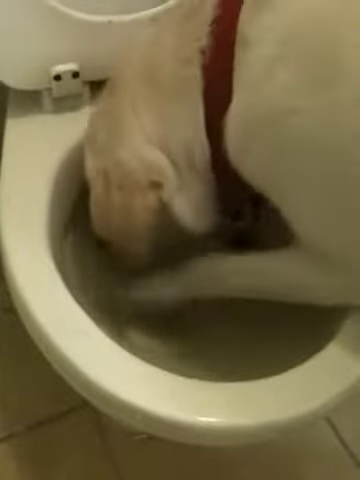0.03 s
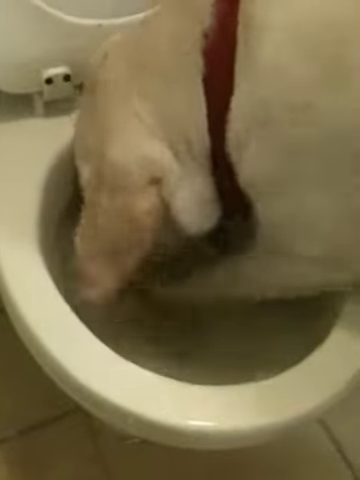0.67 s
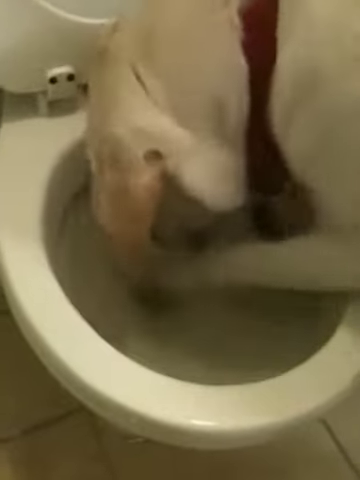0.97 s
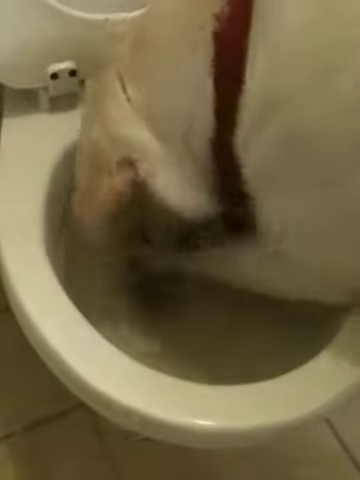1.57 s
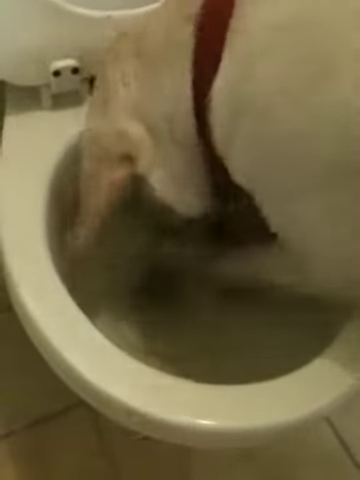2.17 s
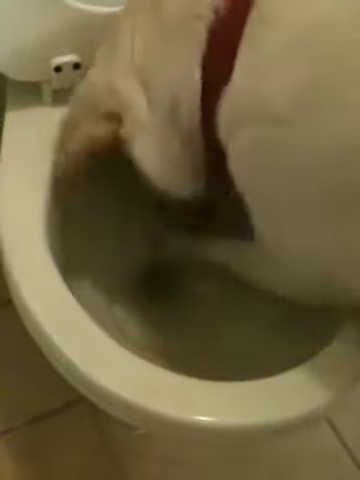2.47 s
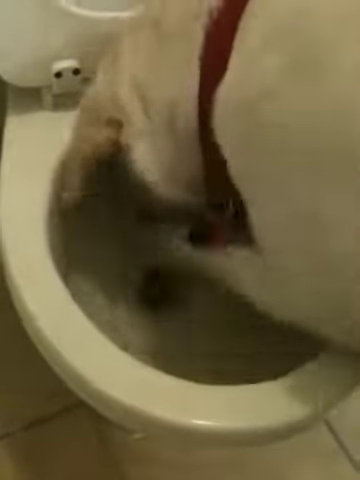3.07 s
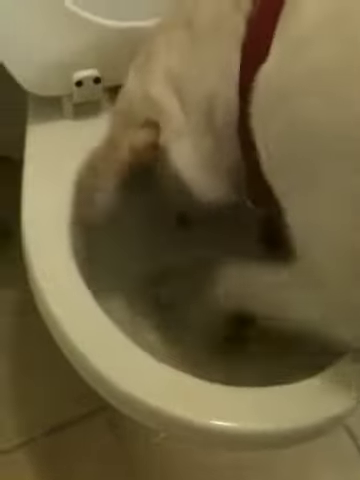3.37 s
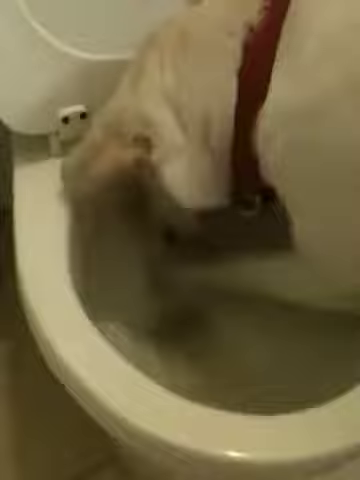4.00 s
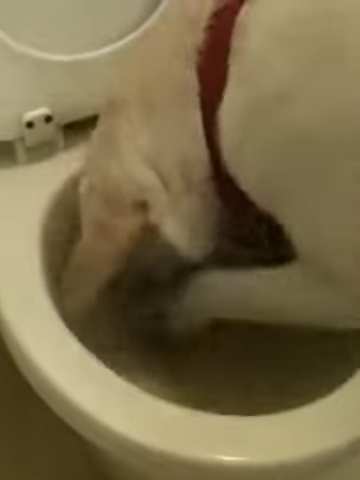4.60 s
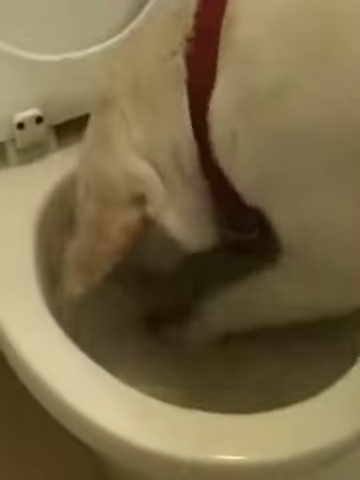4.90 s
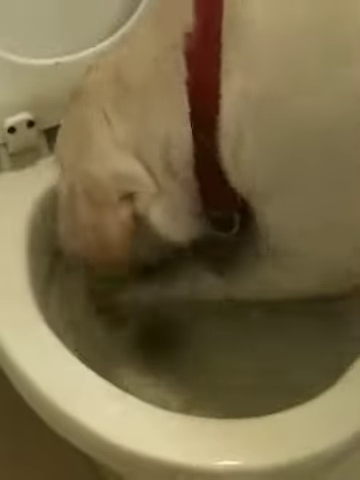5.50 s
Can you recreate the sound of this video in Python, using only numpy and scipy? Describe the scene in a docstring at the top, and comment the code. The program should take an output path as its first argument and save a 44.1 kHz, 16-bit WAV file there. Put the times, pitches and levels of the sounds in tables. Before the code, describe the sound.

A dog digs in toilet water with a front paw, heard from just above the bowl. Splashing starts at once and continues for nearly six seconds in uneven strokes, about three a second. Each stroke slaps the water, throws hissing spray and stirs up bubbles and rising plips. Deeper gulps stand out at about 0.9, 1.3 and 1.9 seconds. Claws and drops tick sharply on the porcelain, most clearly around 1.8, 2.5, 2.9, 4.5 and 5.2 seconds. The leg judders along the bowl with short runs of low, dull thuds near 2.5 and 4 seconds, then bumps it at 4.5 and faintly at 5.6. The slaps get slightly stronger from about 4.5 seconds onward. The bowl adds a hollow ring, and the small tiled bathroom gives a short echo over a faint steady hush.

```python
"""In a small tiled bathroom, heard from just above the toilet, a dog digs in the water with a front paw.
Each stroke slaps the water, throws spray on the porcelain and drags air under, which rises as gulps
and plips. Claws and drops tick on the porcelain, and the leg judders along the bowl with low thuds.
The room echoes and the hollow of the bowl colours it all, over a faint steady hush."""
import sys
import numpy as np
from scipy import signal
from scipy.fft import rfft, irfft, next_fast_len
from scipy.io import wavfile
from scipy.ndimage import uniform_filter1d, map_coordinates

SR = 44100
rng = np.random.default_rng(int(sys.argv[2]) if len(sys.argv) > 2 else 0)


def store_wav(level_fs):
    """Save 16-bit WAV to argv[1]."""
    pcm = np.round(np.clip(np.atleast_2d(level_fs), -1, 1) * 32767)
    wavfile.write(sys.argv[1], SR, pcm.T.astype(np.int16))


N = 249165

# The tone of moving water: low gurgle, middle splash and high spray. Columns: pitch_hz, level_db
GURGLE_TONE = [(25, -54), (100, -37), (180, -4.5), (300, 2), (500, -5), (800, -1), (1100, -0.5),
               (2500, -45)]
SPLASH_TONE = [(500, -12), (900, -3), (1500, 4), (2500, 3.5), (4200, 2.5), (5500, -4), (9000, -32)]
SPRAY_TONE = [(2350, -53), (4000, -11), (4820, -4.5), (6330, 1), (6900, -1.5), (9550, -4), (13000, -13.5),
              (15100, -14), (16000, -28)]
# How long the tiled room echoes. Columns: pitch_hz, fade_s (the time to fall by 60 dB)
ROOM_ECHO = [(150, 0.11), (600, 0.2), (2000, 0.22), (6000, 0.076), (15000, 0.081)]


def amp(db):
    """Turn decibels into a number to multiply by."""
    return 10 ** (np.asarray(db) / 20)


def unit(x):
    """Scale x to an average power of 1."""
    return x / np.sqrt(np.mean(x ** 2) + 1e-20)


def fade(t, fade_s):
    """A curve that falls by 60 dB in fade_s."""
    return np.exp(-np.log(1000) * t / np.maximum(fade_s, 1e-4))


def look_up(table, hz):
    """Read between the rows of a (pitch_hz, value) table, with octaves evenly spaced."""
    pitches, values = np.transpose(table)
    return np.interp(np.log(hz + 1), np.log(pitches + 1), values)


def filtered(x, response):
    """Multiply each frequency in x by response(hz)."""
    size = next_fast_len(N + SR // 2)
    return irfft(rfft(x, size) * response(np.fft.rfftfreq(size, 1 / SR)), size)[:N]


def coloured(x, tone):
    """Shape x with a (pitch_hz, level_db) table, then scale it to a power of 1."""
    return unit(filtered(x, lambda hz: amp(look_up(tone, hz))))


def keep_side(x, side, hz, order):
    """Keep the "low" or "high" side of hz; a higher order cuts more sharply."""
    return signal.sosfilt(signal.butter(order, hz, side, fs=SR, output="sos"), x)


def wobble(per_s):
    """A smooth curve through per_s random points a second."""
    return map_coordinates(rng.standard_normal(int(N * per_s / SR) + 4), [np.arange(N) * per_s / SR])


def add(track, start_s, sound):
    """Mix a sound into a track at start_s."""
    start = max(round(start_s * SR), 0)
    part = sound[:max(N - start, 0)]
    track[start:start + len(part)] += part


def patchy_noise(patchy_db, size=256):
    """Noise in short louder and softer patches, so its tone keeps changing."""
    bands = signal.stft(rng.standard_normal(N), nperseg=size)[2]
    patches = uniform_filter1d(rng.standard_normal(bands.shape), 5, axis=0)
    patches = unit(uniform_filter1d(patches, 3, axis=1))
    return unit(signal.istft(bands * amp(patchy_db * patches), nperseg=size)[1][:N])


def bubbles(low_hz, high_hz, cycles, rise, scatter_db, count, size):
    """A cloud of bubbles: each rings for some cycles and rises in pitch."""
    when, pitch, weight, life = rng.random((count, 4)).T[:, :, None]
    hz = low_hz + (high_hz - low_hz) * pitch
    fade_s = cycles * (.5 + life) / hz
    t = np.arange(size) / SR
    glide = 1 + rise * np.minimum(t / fade_s, 1) / 2
    ring = np.sin(2 * np.pi * hz * t * glide) * fade(t, fade_s)
    strength = amp(scatter_db * weight ** 2) / np.sqrt(fade_s)
    where = (when * N).astype(int) + np.arange(size)
    return unit(np.bincount(where.ravel(), (strength * ring).ravel(), N)[:N])


def paw_strokes(rise_s=0.015, settle_s=0.26, surge_db=2.5):
    """How strong gurgle, splash and spray are as each stroke builds up, holds and settles."""
    # The paw drags through the pool. Columns: start_s, length_s, splash_db, gurgle_db, spray_db
    # (the last two are counted from splash_db)
    strokes = [(0.0, 0.007, -44.5, -7.5, 1), (0.162, .3, -51, -13, 2), (0.467, 0.13, -48.5, -12.5, -2),
               (0.682, 0.3, -48.5, -7, 3), (1.104, 0.25, -50.5, -6.5, 0), (1.567, 0.072, -50.5, -9.5, 3),
               (1.765, 0.553, -52, -9.5, 6), (2.464, 0.24, -55.5, -4.5, 4.5), (2.936, 0.37, -52, -13, 3),
               (3.282, 0.12, -44.5, -10.5, -0.5), (3.412, 0.49, -52.5, -28, 3),
               (3.64, 0.22, -46.5, -9, 1.5), (4.026, .22, -53.5, -13, 6), (4.472, 0.31, -50, -8.5, 3),
               (4.83, 0.32, -50.5, -7.5, 4.5), (5.21, .22, -50, -15, 5), (5.51, 0.19, -57, -8, 1.5)]
    # The pool sloshing between strokes. Columns: gurgle_db, splash_db, spray_db
    slosh_db = [-74.5, -65.5, -60]
    t = np.arange(N) / SR
    power = np.outer(amp(slosh_db) ** 2, np.ones(N))
    for start_s, length_s, splash_db, gurgle_db, spray_db in strokes:
        build = np.clip((t - start_s) / rise_s, 0, 1)
        settle = fade(np.maximum(t - start_s - length_s, 0), settle_s)
        power += np.outer(amp(splash_db) * amp([gurgle_db, 0, spray_db]), build * settle) ** 2
    return np.sqrt(power) * amp(surge_db * wobble(per_s=40))


def churning_water(foam_db=(-7, -7, -3), drops_db=-9):
    """The paw stirs up foam and three sizes of bubble; stray drops fall back."""
    clouds = [bubbles(198.4, 933, cycles=46, rise=0.488, scatter_db=8, count=700, size=4000),
              bubbles(866, 4836, cycles=46, rise=0.17, scatter_db=7.5, count=5000, size=1200),
              bubbles(4280, 17100, cycles=67, rise=0.18, scatter_db=8.5, count=14000, size=240)]
    stir = paw_strokes()
    out = np.zeros(N)
    for strength, cloud, db, tone in zip(stir, clouds, foam_db, (GURGLE_TONE, SPLASH_TONE, SPRAY_TONE)):
        foam = patchy_noise(patchy_db=4.5)  # bubbles too many to tell apart
        out += strength * coloured(cloud + amp(db) * foam, tone)
    drops = bubbles(3550, 9430, cycles=71, rise=0.063, scatter_db=23, count=260, size=600)
    return out + amp(drops_db) * stir[-1] * drops  # more spray in the air makes louder drops


def slaps(cavity_db=8, width_octaves=0.78, air_db=-13, spray_db_per_octave=7, even_hz=2304, size=8192):
    """Each slap tears the water into a quick spatter, coloured by the hole (cavity) that it opens."""
    # The paw or thrown water hits the pool. Columns: start_s, level_db, trapped_air_db, cavity_hz, fade_s
    hits = [(0.016, -37.5, -6, 3200, 0.054), (0.1121, -44, 4, 3930, 0.047), (0.1423, -35.5, 4, 1800, 0.038),
            (0.213, -39, -10, 4400, 0.063), (0.267, -34, -1, 2420, 0.031), (0.3318, -33.5, -9, 2300, 0.14),
            (0.4632, -34, -6, 1130, 0.061), (0.518, -32.5, 0, 2000, 0.083), (0.5435, -38, 6, 2220, .09),
            (0.56, -38.5, 3, 2300, .06), (0.664, -38, -8, 2580, 0.037), (0.6765, -32, 6, 1980, 0.062),
            (0.7124, -32.5, -9, 2730, 0.13), (0.7313, -33.5, 0, 1880, 0.13), (0.75, -33, 4, 2100, 0.09),
            (0.8846, -35, 2, 1780, 0.16), (0.9095, -29, 14, 2200, 0.096), (0.9797, -36, -4, 4660, 0.021),
            (1.0685, -41, 3.5, 4100, 0.16), (1.092, -39, -12, 3370, 0.049), (1.145, -39, -13, 2180, 0.19),
            (1.178, -35.5, -4, 2960, 0.093), (1.2615, -41, 0, 1700, .05), (1.281, -34, 3.5, 1350, .1),
            (1.298, -38.5, 14, 1670, 0.11), (1.582, -38.5, -19, 4300, .044), (1.593, -31, -16, 1940, 0.05),
            (1.7575, -32, 1.5, 3360, 0.08), (1.788, -45, 23.5, 2590, .07), (1.958, -42.5, -6, 4400, 0.043),
            (2.0042, -37, 0.5, 3120, 0.045), (2.02, -36, -13, 4500, 0.046), (2.094, -36, -28, 3900, 0.034),
            (2.225, -41.5, 5, 2130, 0.13), (2.3426, -42, -8, 4330, 0.04), (2.393, -38, 0.5, 3370, 0.081),
            (2.5125, -37, -18, 3320, 0.044), (2.5373, -31.5, -2, 2400, 0.044),
            (2.6182, -36, -4, 4400, .055), (2.808, -41, 9, 4230, 0.056), (2.9248, -34, -28, 3400, .07),
            (3.064, -36.5, -2, 5600, 0.043), (3.1581, -37, 1, 1900, 0.082),
            (3.3002, -30.5, -4.5, 2600, 0.095), (3.3224, -31.5, -22, 2200, .06),
            (3.498, -35, -19, 3740, 0.019), (3.54, -33.5, -4, 2980, 0.1), (3.607, -35.5, -16, 3260, 0.034),
            (3.707, -37.5, 9, 3260, 0.13), (3.8184, -42.5, -10, 3600, .16),
            (3.959, -36.5, 4.5, 3860, 0.083), (4.097, -30, -2, 2860, 0.04),
            (4.1202, -36.5, 14.5, 1400, 0.05), (4.19, -38, 0, 2360, 0.098), (4.344, -35, 0, 2740, 0.09),
            (4.4598, -39, -8, 4900, 0.076), (4.48, -33, -8, 2100, .06), (4.506, -34, 0, 3500, 0.054),
            (4.5193, -27.5, -6, 2000, 0.045), (4.6683, -35.5, 7.5, 3200, 0.14),
            (4.69, -31.5, 1, 3200, 0.05), (4.8522, -29.5, 0.5, 3460, 0.068),
            (4.8935, -30.5, -6, 1900, 0.031), (4.906, -29, 4.5, 2600, 0.11), (5.071, -33.5, 4.5, 2400, .19),
            (5.205, -33, 0, 3870, 0.051), (5.2214, -29.5, -4.5, 2860, 0.069),
            (5.243, -41, 11.5, 1840, 0.27), (5.3107, -30, -5, 1590, 0.054),
            (5.318, -24.5, -14, 3060, 0.035), (5.4154, -35.5, -11, 4120, 0.065),
            (5.5022, -35, -7, 2940, 0.12), (5.578, -34, -5, 1840, .036), (5.6297, -31, -18, 2420, 0.027)]
    out, t, hz = np.zeros(N), np.arange(size) / SR, np.fft.rfftfreq(size, 1 / SR)
    spatter = patchy_noise(patchy_db=4) * amp(0.5 * wobble(per_s=450))
    spatter = np.pad(spatter, (0, size), "reflect")
    gurgle, splash, spray = (unit(amp(look_up(tone, hz)))
                             for tone in (GURGLE_TONE, SPLASH_TONE, SPRAY_TONE))
    for start_s, level_db, trapped_air_db, cavity_hz, fade_s in hits:
        cavity = amp(cavity_db * np.exp(-(np.log2((hz + 1) / cavity_hz) / width_octaves) ** 2))
        # A smaller, higher hole throws more spray; at even_hz, spray and splash are equal.
        spray_db = spray_db_per_octave * np.log2(cavity_hz / even_hz)
        colour = amp(air_db + trapped_air_db) * gurgle + unit(splash * cavity) + amp(spray_db) * spray
        burst = irfft(rfft(spatter[round(start_s * SR):][:size]) * colour)
        swell = 1 - np.exp(-t / (0.023 * fade_s))  # broad splashes swell, small ones snap
        add(out, start_s, amp(level_db) * burst * fade(t, fade_s) * swell)
    return keep_side(out, "high", hz=120, order=1)  # the slaps carry little deep bass


def gulps(waver=0.061):
    """Trapped air rings and climbs unsteadily in pitch as it nears the surface."""
    # Single air pockets and big bubbles. Columns: start_s, level_db, pitch_hz, fade_s, climb_octaves
    pockets = [(0.144, -36.5, 1790, 0.078, 0), (0.233, -39, 1395, 0.11, 1.3), (0.245, -45, 530, 0.2, .6),
               (0.475, -31.5, 740, 0.034, 0.73), (0.486, -34.5, 1000, 0.17, 1.7),
               (0.52, -34.5, 367, 0.15, 0.052), (0.544, -37, 672, .09, 0.11), (0.75, -38, 683, 0.086, 0.96),
               (0.803, -39, 536, 0.14, 0), (0.913, -19, 504, 0.02, 0), (0.924, -26, 274.5, 0.081, 1.3),
               (1.182, -24.5, 607, 0.015, .1), (1.2908, -2, 467, 0.0091, 0),
               (1.296, -30.5, 394, 0.077, 1.14), (1.86, -14, 263, 0.034, 1),
               (1.877, -4.5, 314, 0.021, 0.24), (1.883, -20.5, 514, 0.037, 1.07),
               (1.905, -36.5, 847, 0.082, 2.1), (2.033, -30.5, 1100, 0.022, 0.19),
               (2.226, -29.5, 2350, 0.053, 0.67), (2.312, -33, 3320, 0.053, 1.4),
               (2.552, -36.5, 384, 0.11, 0), (2.632, -36.5, 367, 0.11, .2), (3.208, -37, 895, 0.12, 2.2),
               (3.371, -32, 890, 0.068, 1.1), (3.39, -31, 1300, 0.044, 0.43),
               (3.787, -39.5, 1083, .18, 0.66), (3.862, -31.5, 2005, 0.028, 0.4),
               (4.045, -26, 212, .055, 0), (4.124, -29.5, 544, 0.02, 0.51),
               (4.199, -31.5, 930, 0.036, 0.26), (4.483, -17.5, 2540, 0.013, 0.33),
               (4.521, -21, 2030, 0.021, 0.65), (4.59, -41.5, 686, 0.16, 2.9),
               (4.895, -32, 695, 0.071, 0.11), (5.008, -33, 2630, .025, 0.22), (5.075, -37, 704, 0.05, 0),
               (5.245, -23, 2230, 0.021, 0.094), (5.272, -33.5, 638, 0.032, 0.05),
               (5.317, -29.5, 1315, 0.047, 0.11)]
    out, t = np.zeros(N), np.arange(SR // 5) / SR
    drift = np.pad(wobble(per_s=260), (0, len(t)))
    for start_s, level_db, pitch_hz, fade_s, climb_octaves in pockets:
        climb = 2 ** (climb_octaves * np.minimum(t / fade_s, 1))
        unsteady = 1 + waver * drift[round(start_s * SR):][:len(t)]
        ring = np.sin(2 * np.pi * np.cumsum(pitch_hz * climb * unsteady) / SR)
        swell = 1 - np.exp(-t * pitch_hz / 1.36)
        add(out, start_s, amp(level_db) * swell * fade(t, fade_s) * ring)
    return keep_side(out, "high", hz=215, order=3)


def porcelain_ticks(ring_cycles=15.4, boost_db=3):
    """Claws and drops strike the hard porcelain: a brief ring with a crack of noise."""
    # Each sharp little contact. Columns: start_s, level_db, pitch_hz
    contacts = [(0.34, -31, 4450), (0.9205, -15, 6700), (1.762, -7.5, 8040), (1.7846, -14.5, 9150),
                (2.053, -25, 4250), (2.098, -12, 5570), (2.436, -22, 7800), (2.522, -12, 5840),
                (2.524, -9.5, 6100), (2.621, -17, 4130), (2.9229, -5.5, 8940), (3.563, -18, 5800),
                (3.6017, -19, 5370), (4.1014, -21, 2450), (4.524, -12.5, 3560), (4.908, -13.5, 3230),
                (5.2019, -11.5, 7000), (5.504, -17, 5430)]
    out, t = np.zeros(N), np.arange(SR // 50) / SR
    for start_s, level_db, pitch_hz in contacts:
        snap = np.sin(2 * np.pi * pitch_hz * t) + 0.037 * rng.standard_normal(len(t))
        shape = fade(t, ring_cycles / pitch_hz) * (1 - np.exp(-t * pitch_hz))
        add(out, start_s, amp(level_db + boost_db) * snap * shape)
    return keep_side(out, "high", hz=1800, order=2)


def leg_knocks(average_gap_s=0.034, weaken_db_per_s=40, scatter_db=2):
    """A padded leg gives the heavy bowl only low, short thuds, in uneven runs that weaken."""
    # The leg judders along the bowl. Columns: start_s, length_s, level_db
    rubs = [(2.476, .29, -29), (4.044, .26, -28), (4.517, .02, -24.5), (5.581, .04, -34)]
    # The dull tone of a thud. Columns: pitch_hz, level_db
    thud_tone = [(30, -23), (90, -35), (160, -2), (300, -3.5), (450, -13), (900, -24), (3000, -63)]
    push, t = np.zeros(N), np.arange(SR // 5) / SR
    thud = fade(t, fade_s=0.05) * (1 - np.exp(-t / 0.016))
    for start_s, length_s, level_db in rubs:
        gap, strength = rng.random((12, 2)).T
        delays = average_gap_s * np.append(0, np.cumsum(.5 + gap[1:]))
        for delay, chance in zip(delays[delays < length_s], 2 * strength - 1):
            knock_db = level_db - weaken_db_per_s * delay + scatter_db * chance
            add(push, start_s + delay, amp(knock_db) * thud)
    return push * coloured(rng.standard_normal(N), thud_tone)


def ringing_echo(x):
    """An echo that keeps the pitch of the sound that starts it."""
    hz, t, bands = signal.stft(rng.standard_normal(SR // 2), SR, nperseg=256)
    tail = signal.istft(bands * fade(t, look_up(ROOM_ECHO, hz)[:, None]), SR, nperseg=256)[1]
    late_tail = np.pad(tail / np.linalg.norm(tail), (SR // 200, 0))
    return signal.fftconvolve(x, late_tail)[:N]


def scattered_echo(x, size=256):
    """The energy at each pitch comes back a moment later as noise and dies away."""
    hz, t, bands = signal.stft(x, SR, nperseg=size)
    kept_per_step = fade(t[1], look_up(ROOM_ECHO, hz)) ** 2
    energy = np.array([signal.lfilter([0, 1 - kept], [1, -kept], np.abs(band) ** 2)
                       for kept, band in zip(kept_per_step, bands)])
    noise = signal.stft(rng.standard_normal(N), nperseg=size)[2]
    return signal.istft(noise / np.std(noise) * np.sqrt(np.abs(energy)), nperseg=size)[1][:N]


def bathroom(x, ring_db=-9, scatter_db=-6.5, split_hz=1700):
    """Between the tiled walls low sounds ring on, while high sounds scatter."""
    low, high = (keep_side(x, side, split_hz, order=4) for side in ("low", "high"))
    return x + amp(ring_db) * ringing_echo(low) + amp(scatter_db) * scattered_echo(high)


def bowl(x):
    """The air in the hollow of the bowl rings along with the direct sound."""
    # The notes of the hollow. Columns: pitch_hz, width_hz, level_db (counted from the direct sound)
    notes = [(240, 6, -9), (294.4, 13, 4), (376.4, 6, 1), (576, 28, 1), (634.5, 52, 2), (680, 15.6, 7),
             (1980, 200, -9), (3400, 194, -4)]
    return filtered(x, lambda hz: 1 + sum(
        amp(level_db) * 1j * hz * width_hz / (pitch_hz ** 2 - hz ** 2 + 1j * hz * width_hz)
        for pitch_hz, width_hz, level_db in notes))


def room_hush(level_db=-64):
    """The faint, steady background noise of the room."""
    # The tone of the quiet room. Columns: pitch_hz, level_db
    hush_tone = [(25, -1.5), (120, 3), (280, 17.5), (600, -15), (2000, -17), (8000, -9), (16000, -6.5)]
    return amp(level_db) * coloured(rng.standard_normal(N), hush_tone)


def scene():
    """All the digging echoes in the room and sounds through the hollow of the bowl."""
    hush = room_hush()
    digging = churning_water() + slaps() + gulps() + porcelain_ticks() + leg_knocks()
    return (bowl(bathroom(digging)) + hush)[None]


def record(dry, top_hz=16000):
    """Cut away the very highest treble, above top_hz."""
    return filtered(dry[0], lambda hz: 1 / np.sqrt(1 + (hz / top_hz) ** 160))[None]


dry = scene()
out = record(dry)
store_wav(out)
```